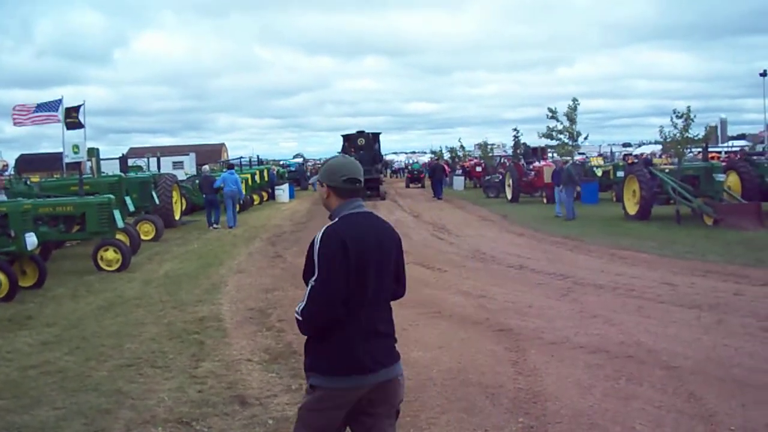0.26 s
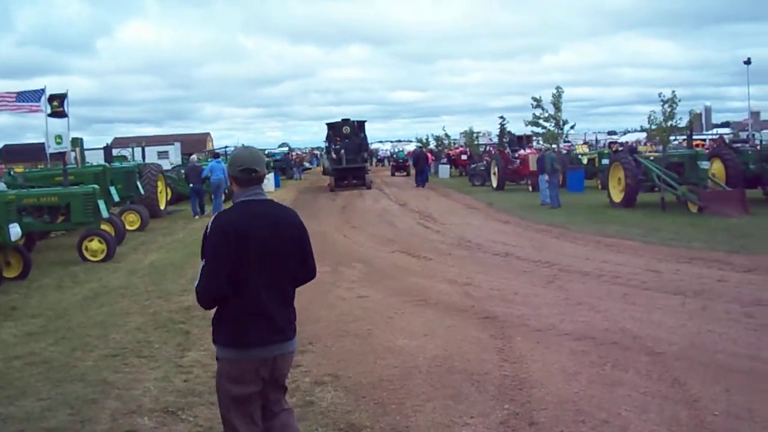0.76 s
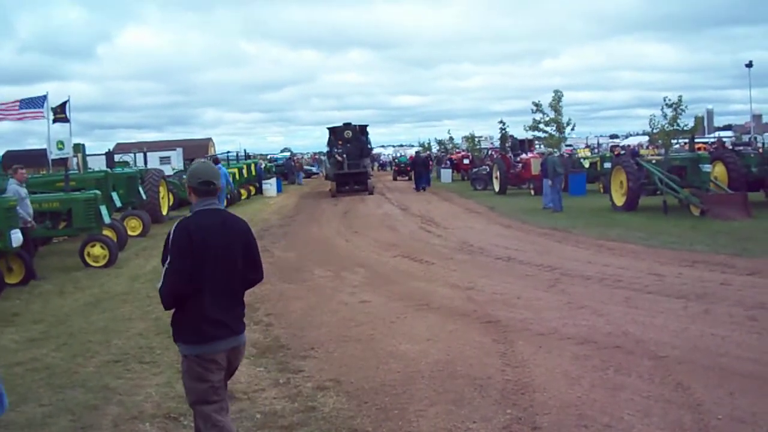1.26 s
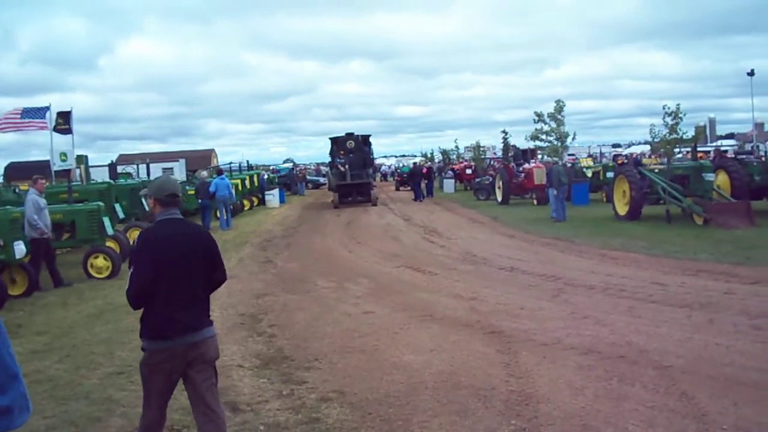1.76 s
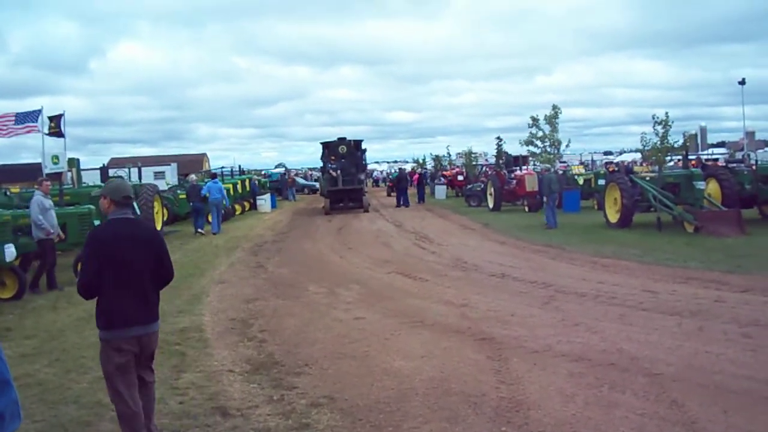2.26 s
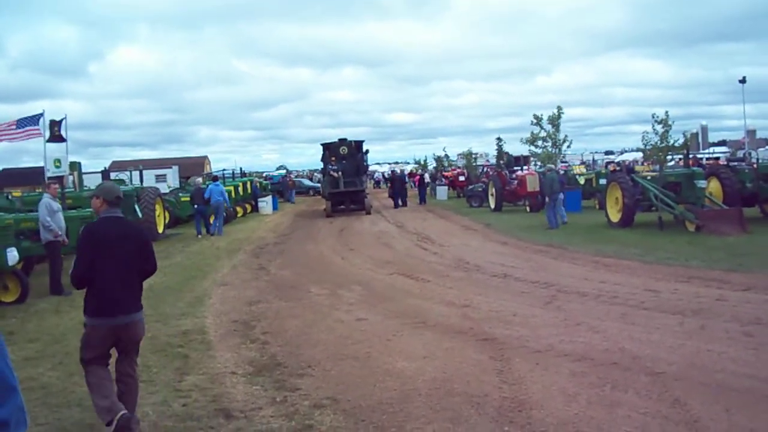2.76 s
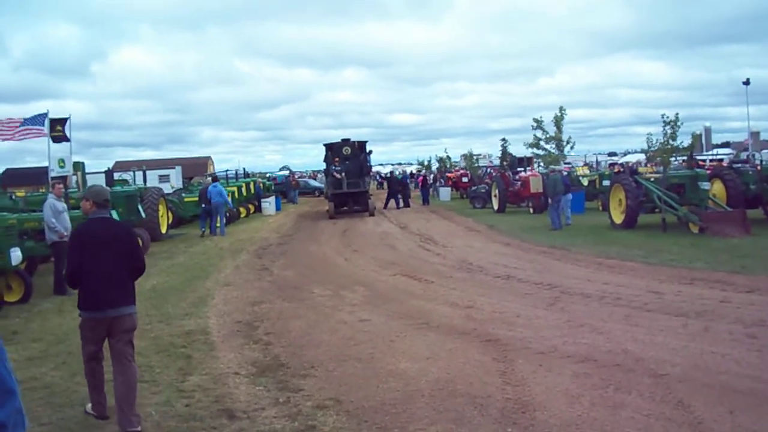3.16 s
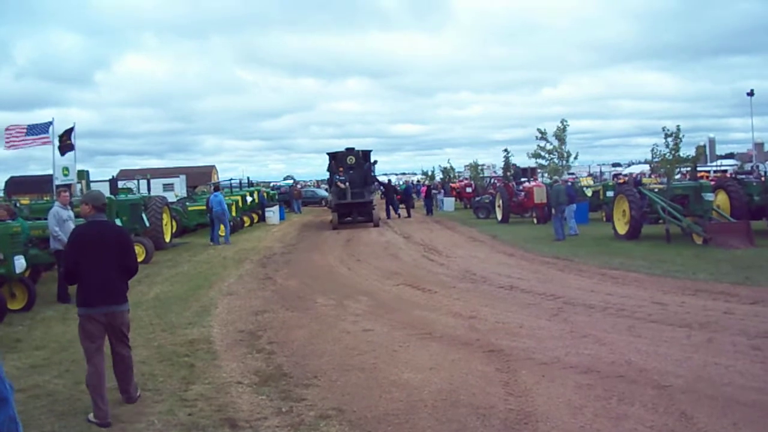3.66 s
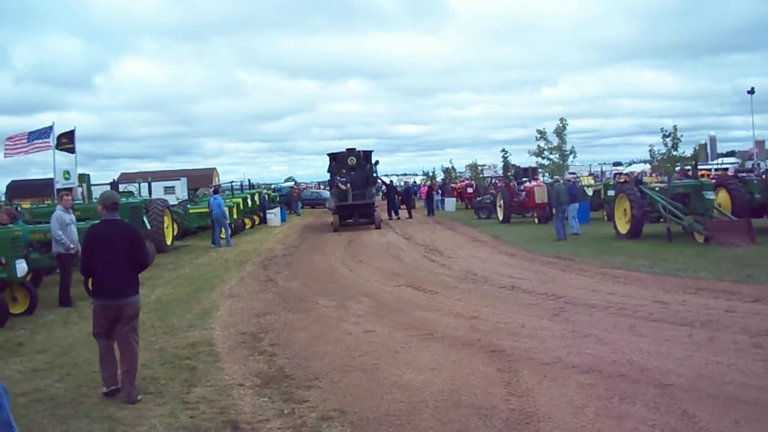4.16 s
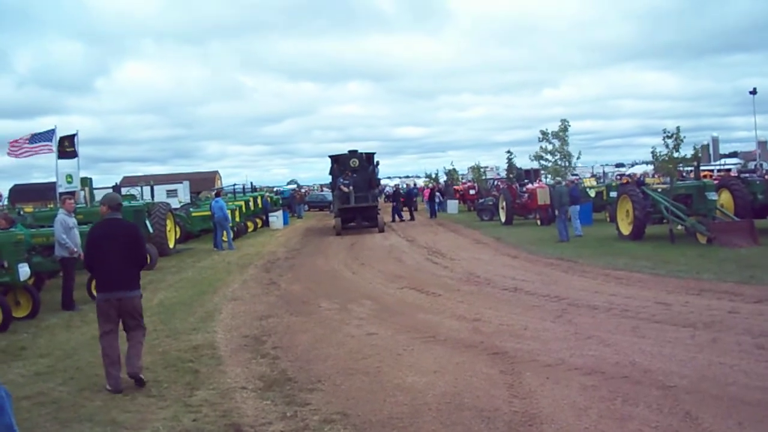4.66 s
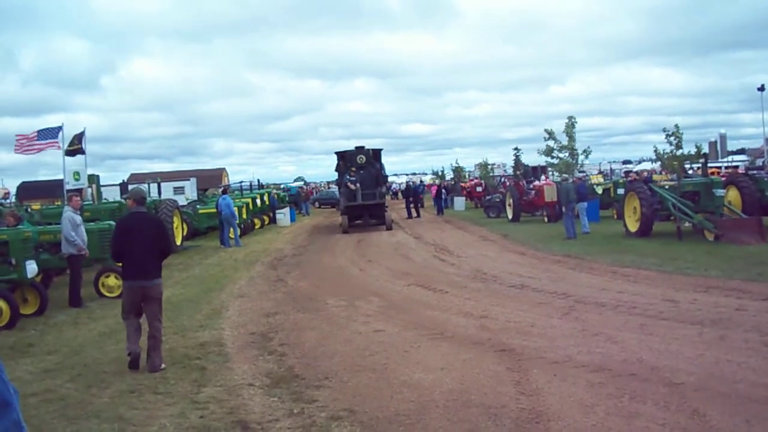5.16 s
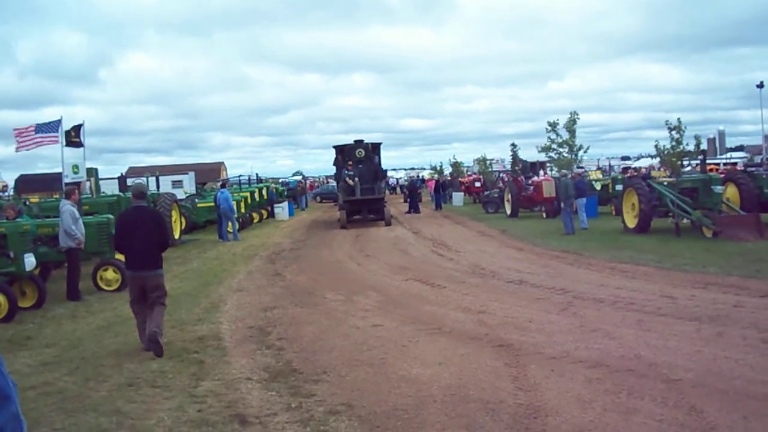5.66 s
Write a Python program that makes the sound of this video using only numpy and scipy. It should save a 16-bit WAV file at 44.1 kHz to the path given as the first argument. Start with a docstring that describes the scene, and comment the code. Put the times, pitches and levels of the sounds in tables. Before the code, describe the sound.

Wind buffets the microphone from the start, a low, uneven rumble with fluttering gusts and short thumps. A brief blast tears across it at about 0.7 seconds, and the hardest one, around 1.2 seconds, overloads it and blots out everything else. More gusts hit near 1.9 and from 2.3 to 2.7 seconds. Behind the wind, some way off outdoors, a steam traction engine chuffs quickly, about twelve puffs a second, over a soft rush of draught and running gear. The puffs are faint at first, rise from about 3 seconds as the wind eases, dip around 4.5 seconds, where another gust strikes, and are loudest from 5 seconds to the end, near 6 seconds. A thin, high, half-whistling steam hiss wavers and sputters throughout, swelling near 4.2 and 5.8 seconds.

```python
"""Gusty wind buffets the microphone and, at its strongest, overloads it.
Behind it a steam traction engine rolls along a dirt lane, some way off: each piston stroke
puffs steam out of the stack, about twelve a second, louder in the second half.
Steam hisses from it in a wavering band, over the rush of its draught and running gear."""
import sys
import numpy as np
from scipy.fft import rfft, irfft, next_fast_len
from scipy.io import wavfile
from scipy.ndimage import uniform_filter1d, map_coordinates

SR = 44100
rng = np.random.default_rng(int(sys.argv[2]) if len(sys.argv) > 2 else 0)


def digitize_waveform(pressure):
    """Quantize a signal to 16-bit integers and store it at the path in sys.argv[1].

    Rows of a 2-D input are taken as channels; values are limited to [-1, 1].
    """
    field = np.atleast_2d(pressure).T
    bounded = np.clip(field, -1, 1)
    quanta = np.round(bounded * 32767).astype(np.int16)
    wavfile.write(sys.argv[1], SR, quanta)


N = 261072


def amp(db):
    """Decibels to gain."""
    return 10 ** (np.asarray(db) / 20)


def unit(x):
    """x at rms 1."""
    return x / np.sqrt(np.mean(x ** 2) + 1e-20)


def evened(x, window_samples):
    """x with its running rms held at 1."""
    return x / np.sqrt(np.abs(uniform_filter1d(x ** 2, size=window_samples)) + 1e-6)


def time_s():
    """Time of every sample."""
    return np.arange(N) / SR


def curves(rows):
    """One per-sample curve for each column after the time."""
    knots_s, *columns = np.transpose(rows)
    return [np.interp(time_s(), knots_s, column) for column in columns]


def wobble(rate_hz):
    """Smooth random curve through rate_hz knots a second."""
    knots = rng.standard_normal(int(N * rate_hz / SR) + 4)
    return map_coordinates(knots, [time_s() * rate_hz], mode="mirror")


def filtered(x, response):
    """x through the frequency response response(hz)."""
    size = next_fast_len(N + 8192)
    return irfft(rfft(x, size) * response(np.fft.rfftfreq(size, 1 / SR)), size)[:N]


def colour(spectrum, hz):
    """Gain at hz from (freq_hz, gain_db) rows, on a log axis."""
    freq_hz, gain_db = np.transpose(spectrum)
    return amp(np.interp(np.log(hz + 1), np.log(freq_hz + 1), gain_db))


def noise(spectrum):
    """Coloured noise at rms 1."""
    return unit(filtered(rng.standard_normal(N), lambda hz: colour(spectrum, hz)))


def puff(crest_s, rise_s, fall_s):
    """Envelope: Gaussian rise to 1, exponential fall."""
    age_s = time_s() - crest_s
    return np.exp(-(np.minimum(age_s, 0) / rise_s) ** 2 - np.clip(age_s / fall_s, 0, 20))


def wind(lumps_db=3.0, bursts_db=2.0, coupling=0.27, unrest_db=1.5):
    """Slow pressure swings; smaller eddies come in lumps, most at a swing's height and in gusts."""
    # breeze at the microphone: time_s, swing_db, rumble_db, flutter_db
    breeze = [(0, -24, -25.5, -35.5), (0.15, -15, -21.5, -29.5), (0.68, -14, -24, -31.5),
              (0.88, -11, -18, -25.5), (1.3, -11, -19.5, -30), (1.65, -14.5, -25.5, -30),
              (2.3, -14.5, -24.5, -30.5), (2.7, -13, -19.5, -27.5), (3.1, -14.5, -27.5, -34.5),
              (3.75, -15, -24, -35), (4.0, -16.5, -26.5, -35.5), (4.4, -15, -23.5, -34),
              (4.8, -17.5, -24.5, -39), (5.3, -18, -20, -35.5), (5.92, -19, -22.5, -37.5)]
    # gusts above the breeze: crest_s, half_length_s, lift_db
    gusts = [(0.097, 0.028, 7), (0.246, 0.039, 8.5), (0.347, 0.055, 7.5), (0.866, .045, 7),
             (0.985, 0.042, 6), (1.154, .035, 13.5), (1.31, 0.033, 8.5), (1.502, 0.022, 6),
             (1.897, .045, 10.5), (2.186, 0.027, 7.5), (2.357, 0.058, 12.5), (2.537, 0.031, 6.5),
             (2.696, 0.042, 7.5), (3.333, 0.021, 5.5), (4.32, 0.034, 5), (4.457, 0.023, 6),
             (4.631, 0.037, 9.5)]
    # wind bands, low to high: freq_hz, density_db
    swing_spectrum = [(2, -17), (8, 8), (13, 3.5), (25, 1.5), (50, -3), (80, -11), (150, -38), (500, -61.5)]
    rumble_spectrum = [(25, -21), (55, -6), (90, 0.5), (140, -3.5), (210, -6.5), (300, -15), (600, -36),
                       (1500, -86.5)]
    flutter_spectrum = [(60, -27), (180, -9.5), (290, 0), (450, -2.5), (800, -12), (1300, -23.5),
                        (2200, -36.5), (4000, -45.5), (8000, -59.5)]
    swing_db, rumble_db, flutter_db = curves(breeze)
    lift_db = sum(db * np.exp(-((time_s() - crest_s) / half_s) ** 2) for crest_s, half_s, db in gusts)
    lift_db += unrest_db * wobble(16)
    swing = evened(noise(swing_spectrum), window_samples=6000)
    lumps = amp(lumps_db * wobble(130) + bursts_db * wobble(35)) * (1 + coupling * swing ** 2)
    rumble = evened(np.sqrt(lumps) * noise(rumble_spectrum), window_samples=4000)
    flutter = evened(lumps * noise(flutter_spectrum), window_samples=3000)
    return (amp(swing_db + 0.3 * lift_db) * swing
            + amp(rumble_db + lift_db) * rumble
            + amp(flutter_db + 1.09 * lift_db) * flutter)


def chuffing(rise_s, fall_s, effort=((0, 0),), scatter_db=1.27):
    """Envelope of one puff per piston stroke, accented by its place in the turn of the crank."""
    # engine speed: time_s, stroke_rate_hz
    speed = [(0, 11.9), (1.0, 12.45), (2.5, 12.5), (2.9, 12.2), (4.3, 12.3), (4.8, 11.75), (5.92, 11.62)]
    # four strokes of one crank turn: accent_db
    crank_accents = [-0.5, 1.1, 3, 0]
    rate_hz, = curves(speed)
    strokes_done = np.cumsum(rate_hz) / SR
    count = int(strokes_done[-1]) + 1
    crests_s = np.interp(np.arange(count), strokes_done, time_s())
    accents_db = np.resize(crank_accents, count) + scatter_db * rng.standard_normal(count)
    levels_db = np.interp(crests_s, *np.transpose(effort)) + accents_db
    return sum(amp(db) * puff(crest_s, rise_s, fall_s) for crest_s, db in zip(crests_s, levels_db))


def exhaust(echo_gain=0.099, echo_s=0.0052):
    """Each stroke lets a puff of steam out of the stack, whose short echo hollows it."""
    # stack noise: freq_hz, density_db
    spectrum = [(150, -16.5), (400, -1), (900, 4), (1400, -2), (1780, -6.5), (2130, 2.5), (2500, -5.5),
                (3000, -3), (3300, -2), (3550, -3), (4100, -7), (4900, -12), (6500, -11), (8500, -12.5)]
    # exhaust strength: time_s, level_db
    effort = [(0, -42.5), (2.2, -44), (2.9, -40.5), (3.32, -35.5), (3.5, -38), (3.77, -32), (3.9, -38),
              (4.28, -34), (4.4, -46), (4.62, -45.5), (4.72, -37), (4.88, -44), (5.05, -28.5), (5.15, -35),
              (5.38, -28.5), (5.53, -37.5), (5.83, -25.5)]
    hollow = filtered(noise(spectrum), lambda hz: 1 + echo_gain * np.exp(-2j * np.pi * hz * echo_s))
    return chuffing(rise_s=0.018, fall_s=0.031, effort=effort) * unit(hollow)


def draught(rattle_db=3.5):
    """Boiler draught: a continuous rush with the fine unevenness of the running gear."""
    # strength of the rush: time_s, level_db
    levels = [(0, -43), (2.8, -44), (3.7, -42.5), (4.55, -43.5), (4.85, -37.5), (5.4, -36), (5.6, -37.5),
              (5.9, -39)]
    # draught and gear noise: freq_hz, density_db
    spectrum = [(100, -5), (400, 1.5), (950, -0.5), (1300, -2), (1780, -8), (2100, -8), (2550, -8),
                (3300, -11), (4900, -14), (7000, -10), (9000, -16.5)]
    level_db, = curves(levels)
    return amp(level_db + rattle_db * wobble(70)) * noise(spectrum)


def noise_band(centre_hz, half_width_hz):
    """Narrow noise that follows a pitch curve."""
    phase = 2 * np.pi * np.cumsum(centre_hz) / SR
    in_phase, quadrature = (
        filtered(rng.standard_normal(N), lambda hz: 1 / (1 + (hz / half_width_hz) ** 4))
        for _ in range(2))
    return unit(in_phase * np.cos(phase) + quadrature * np.sin(phase))


def steam(whistle_db=-1.5, hiss_db=-5, waver_hz=110, spread_hz=360, flicker_db=7, sputter_db=2.5):
    """Sputtering jet: half-whistles flicker in a wider hiss that drifts and swells with each stroke."""
    # escaping steam: time_s, level_db, centre_hz
    jet = [(0.04, -44, 6104), (0.2, -57, 6230), (0.36, -48.5, 6270), (0.55, -65, 6243), (1.2, -55, 6583),
           (1.44, -51, 6950), (1.65, -56, 6300), (2.1, -52, 6200), (2.8, -50, 6500), (3.08, -50, 6245),
           (3.55, -47, 6520), (3.74, -43, 6100), (3.92, -49, 6960), (4.2, -40, 6800), (4.42, -51, 6730),
           (5.2, -47, 6350), (5.66, -55, 6650), (5.82, -37.5, 6080)]
    level_db, centre_hz = curves(jet)
    whistles = 0
    for side in (-1, 0, 1):
        flicker = amp(flicker_db * np.minimum(wobble(34), 1.5) - 2 * abs(side))
        pitch_hz = centre_hz + side * spread_hz + waver_hz * wobble(19)
        whistles += flicker * noise_band(pitch_hz, half_width_hz=135)
    whistles = evened(whistles, window_samples=12000)
    sputter = amp(sputter_db * wobble(12))
    flow = unit(sputter * (1 + 0.5 * chuffing(rise_s=0.024, fall_s=0.03)))
    hiss = noise_band(centre_hz, half_width_hz=700)
    return amp(level_db) * flow * (amp(whistle_db) * whistles + amp(hiss_db) * hiss)


def eddies(thump_db=-6.5, spike_db=-3, spike_s=0.00032):
    """Single eddies hit the microphone with a spike of suction and a short thump."""
    # eddy strikes: start_s, level_db
    strikes = [(0.131, -14.5), (0.205, -6), (0.353, -11.5), (0.565, -8.5), (0.777, -12), (0.828, -13),
               (0.98, -7), (1.074, -20), (1.137, -9.5), (1.318, -6), (1.832, -12), (1.895, -10),
               (1.925, -10), (2.035, -19.5), (2.102, -13.5), (2.169, -13), (2.304, -11), (2.337, -12.5),
               (2.362, -8.5), (2.414, -8.5), (2.519, -7), (2.689, -10), (2.767, -15.5), (2.875, -12),
               (4.622, -11)]
    # thump noise: freq_hz, density_db
    spectrum = [(30, 7), (150, -10), (400, -4.5), (900, -13.5), (1600, -24), (3000, -38.5), (8000, -41)]
    thumps = suction = 0
    for start_s, level_db in strikes:
        thumps += amp(level_db + thump_db) * puff(start_s + 0.0026, rise_s=0.0012, fall_s=0.008)
        from_spike_s = np.abs(time_s() - start_s - 0.003)
        suction += amp(level_db + spike_db) * np.exp(-np.minimum(from_spike_s / spike_s, 20))
    return thumps * evened(noise(spectrum), window_samples=400) - suction


def surges():
    """One-sided shoves of air; the biggest pin the input and blot out all else."""
    # pressure surges: crest_s, half_length_s, pressure_full_scales
    shoves = [(0.716, 0.0034, -0.6), (1.222, 0.0095, 2.6), (1.2713, 0.0055, -2.4)]
    return sum(pressure * np.exp(-np.minimum(np.abs(time_s() - crest_s) / half_s, 4) ** 3)
               for crest_s, half_s, pressure in shoves)


def blasts(tearing_db=3):
    """The hardest blasts tear across the microphone in flat-topped bursts."""
    # blasts of air: start_s, length_s, level_db
    bursts = [(0.722, 0.0092, -3), (0.73, 0.011, -16), (1.171, 0.037, -1)]
    # tearing noise: freq_hz, density_db
    spectrum = [(20, 12), (230, 9), (450, -3), (1100, -6), (1800, -12), (3000, -21), (5000, -32),
                (8000, -35.5)]
    envelope = 0
    for start_s, length_s, level_db in bursts:
        from_middle = np.abs(2 * (time_s() - start_s) / length_s - 1)
        envelope += amp(level_db) * np.exp(-np.minimum(from_middle, 2) ** 6)
    tearing = amp(tearing_db * wobble(400)) * noise(spectrum)
    return envelope * evened(tearing, window_samples=600)


def scene():
    """The engine some way off, the wind right at the microphone; mono."""
    engine = exhaust() + draught() + steam()
    air = wind() + blasts() + eddies() + surges()
    return (engine + air)[None]


def record(dry, ceiling=0.7, hardness=9, band_hz=9100, top_hz=15800):
    """The input flattens the biggest swings and dulls the treble; overshoots clip again and crackle."""
    # microphone roll-off: freq_hz, gain_db
    roll_off = [(7000, 0), (7500, -2), (8000, -7.5), (8600, -16), (9100, -29)]
    flattened = dry[0] / (1 + np.abs(dry[0] / ceiling) ** hardness) ** (1 / hardness)
    dulled = filtered(flattened, lambda hz: colour(roll_off, hz) * (hz < band_hz))
    clipped = np.clip(dulled, -ceiling, ceiling)
    return filtered(clipped, lambda hz: hz < top_hz)[None]


dry = scene()
out = record(dry)
digitize_waveform(out)
```